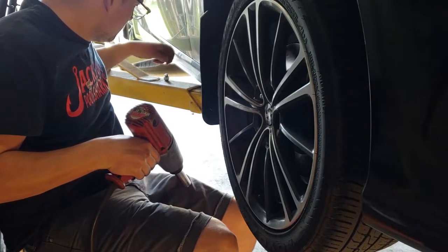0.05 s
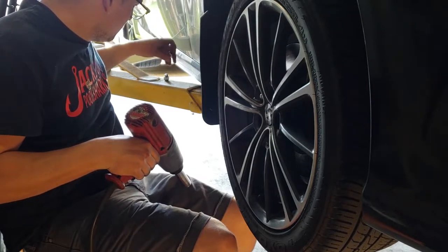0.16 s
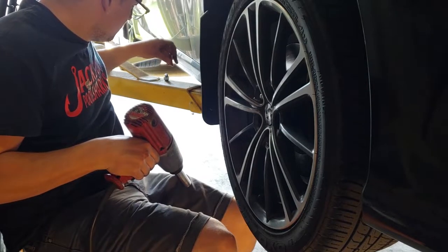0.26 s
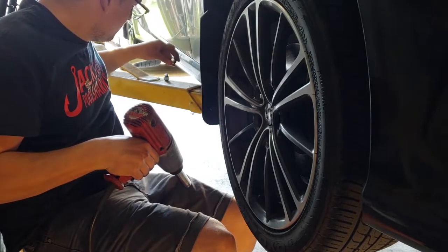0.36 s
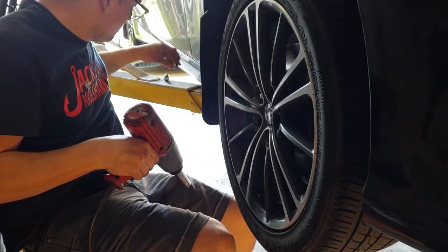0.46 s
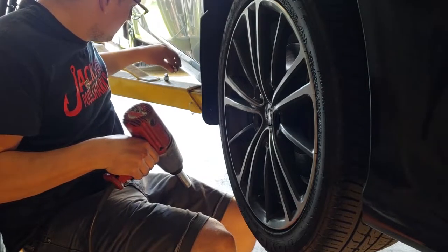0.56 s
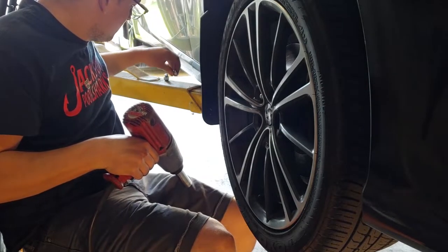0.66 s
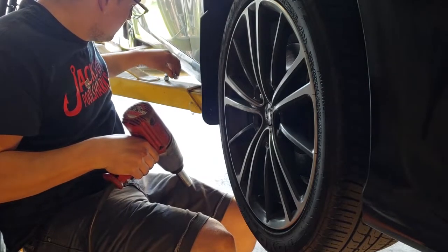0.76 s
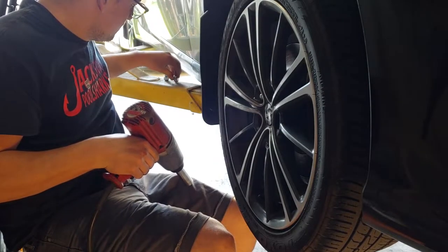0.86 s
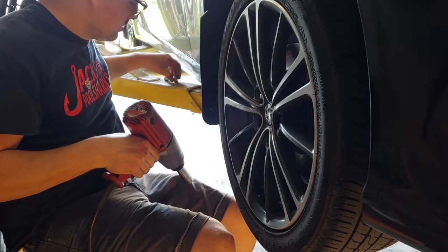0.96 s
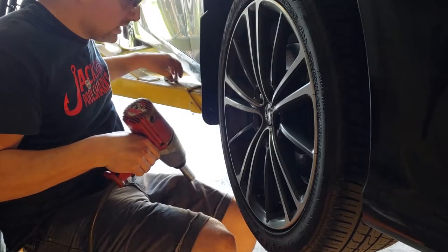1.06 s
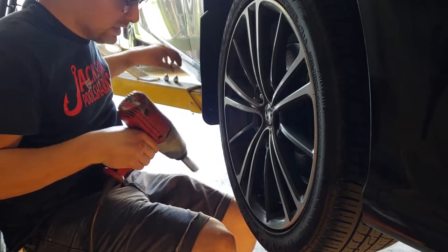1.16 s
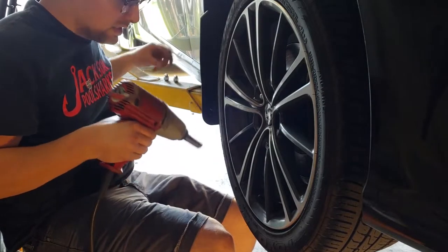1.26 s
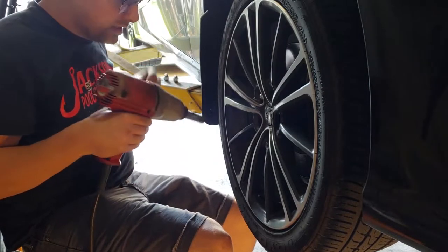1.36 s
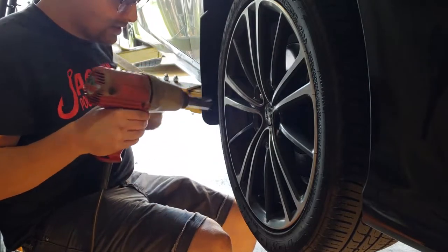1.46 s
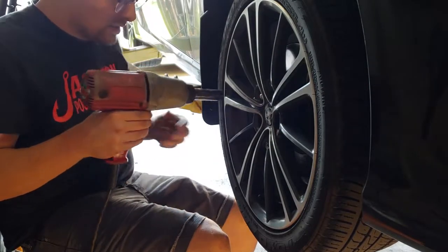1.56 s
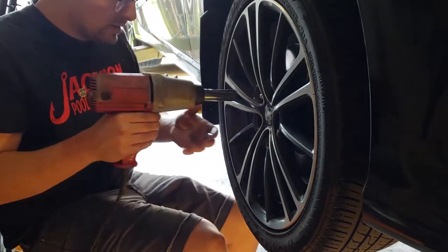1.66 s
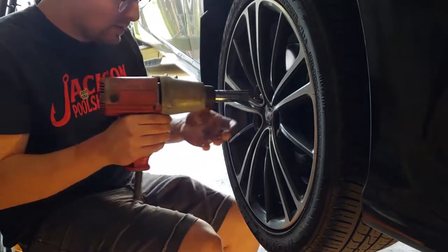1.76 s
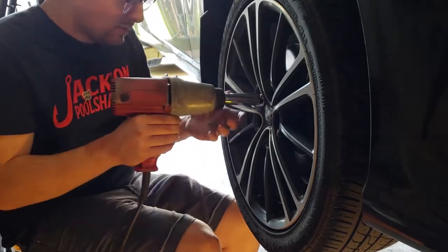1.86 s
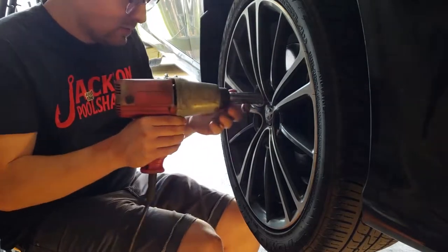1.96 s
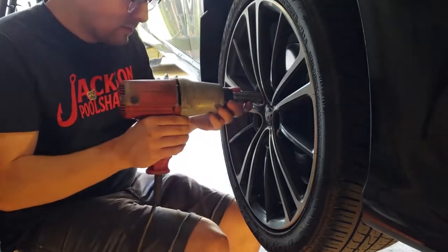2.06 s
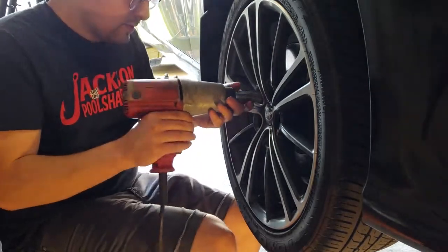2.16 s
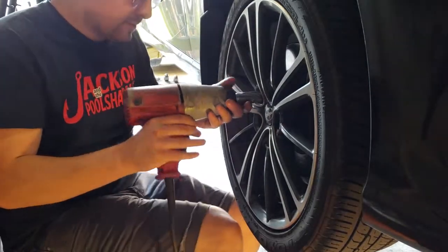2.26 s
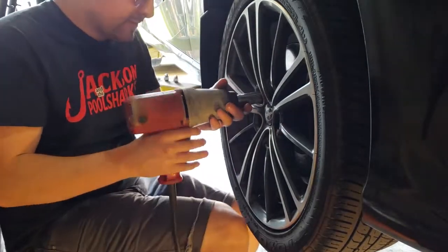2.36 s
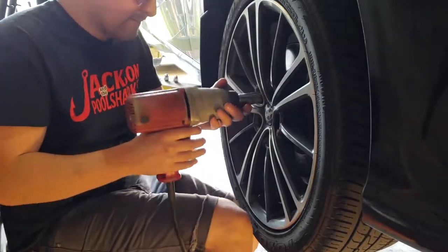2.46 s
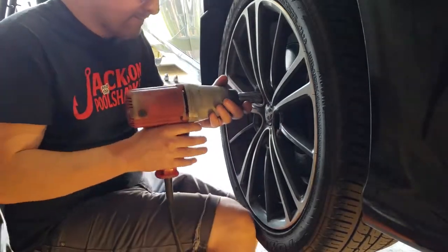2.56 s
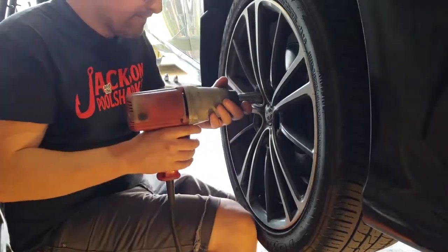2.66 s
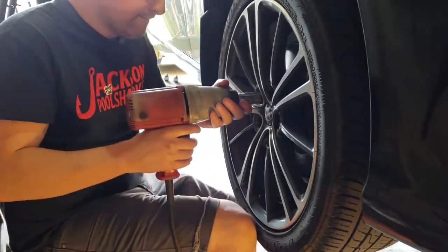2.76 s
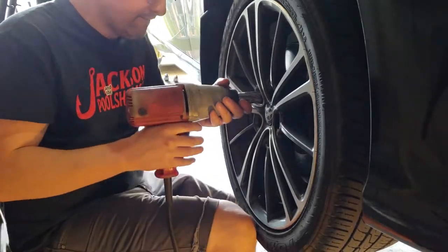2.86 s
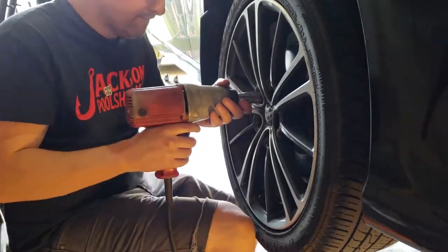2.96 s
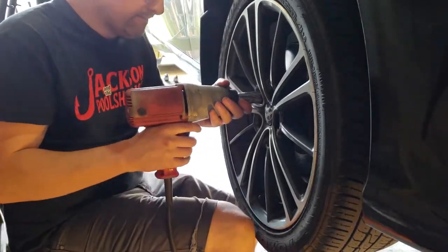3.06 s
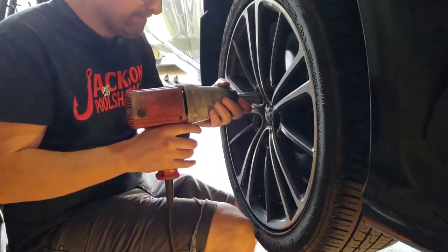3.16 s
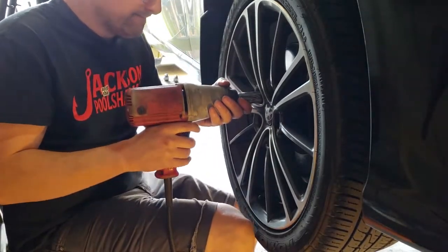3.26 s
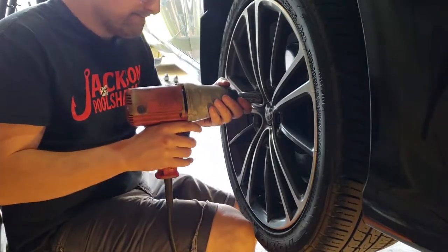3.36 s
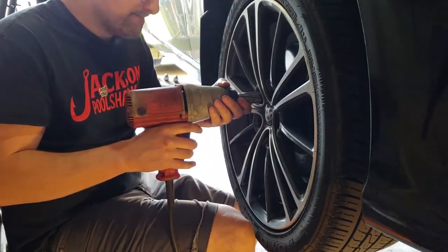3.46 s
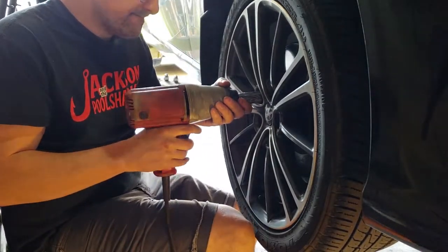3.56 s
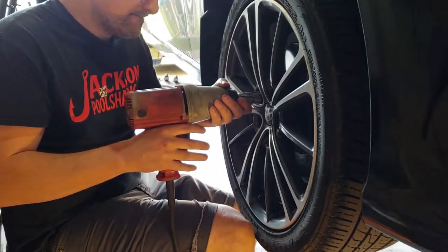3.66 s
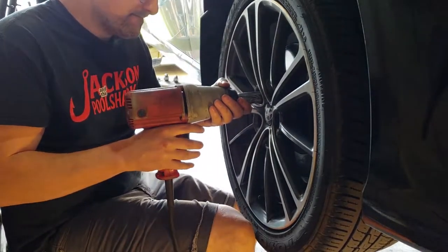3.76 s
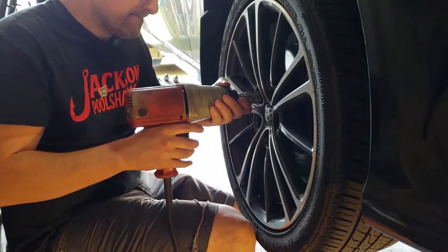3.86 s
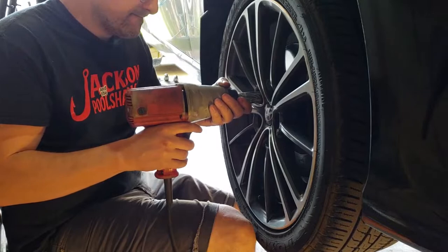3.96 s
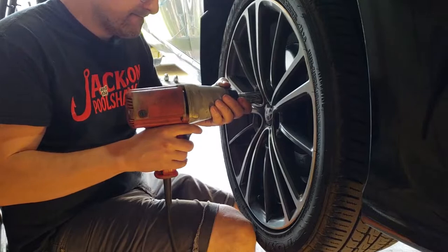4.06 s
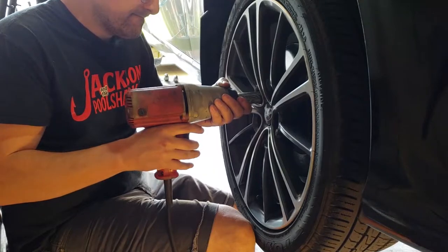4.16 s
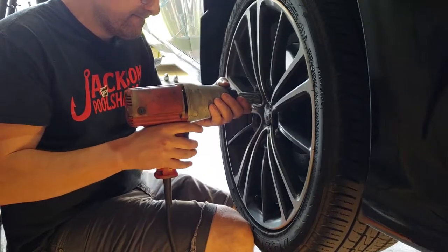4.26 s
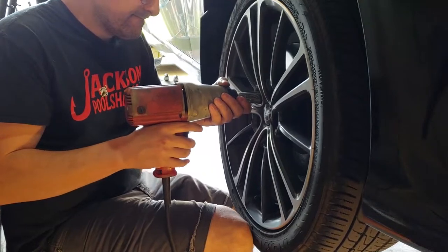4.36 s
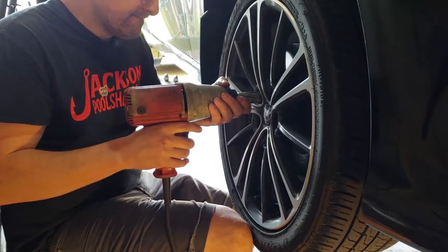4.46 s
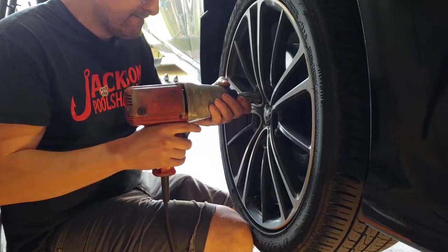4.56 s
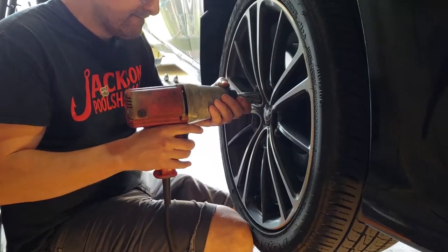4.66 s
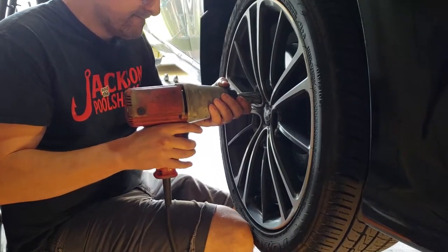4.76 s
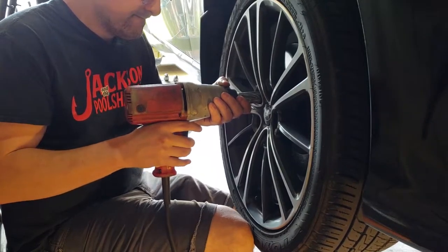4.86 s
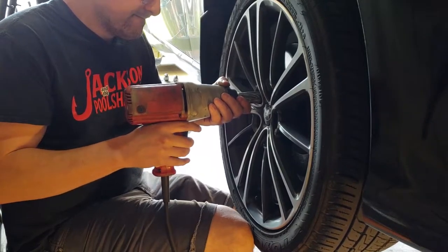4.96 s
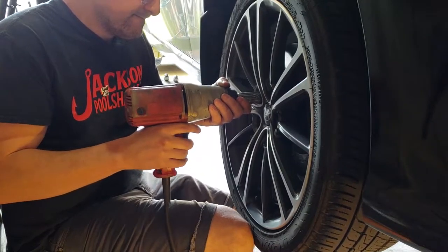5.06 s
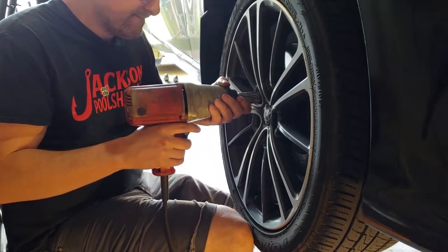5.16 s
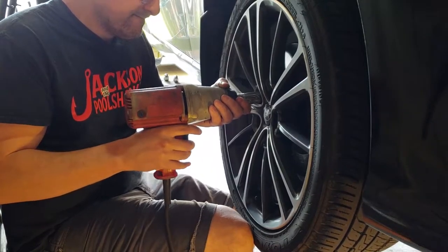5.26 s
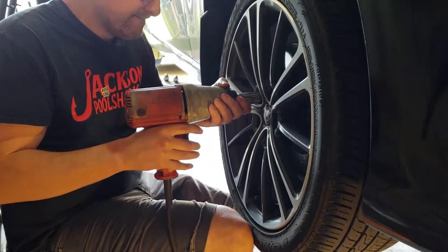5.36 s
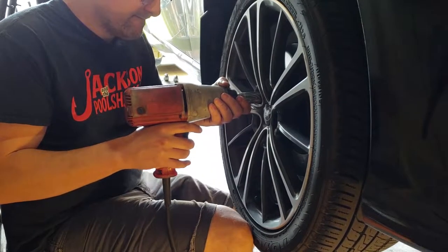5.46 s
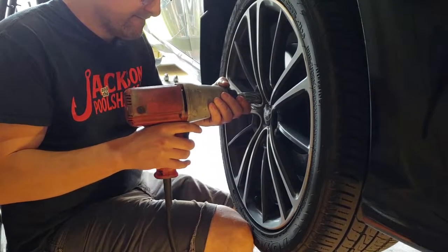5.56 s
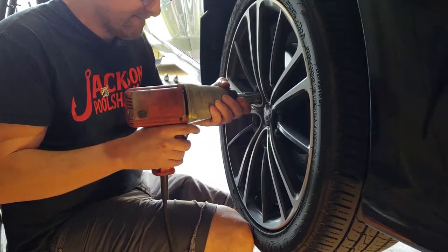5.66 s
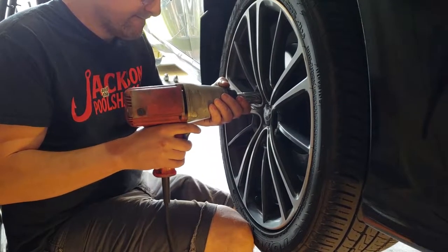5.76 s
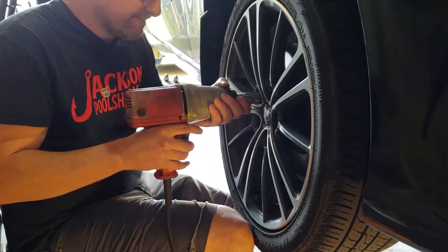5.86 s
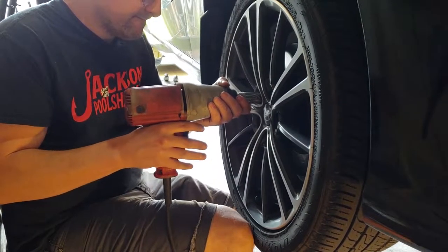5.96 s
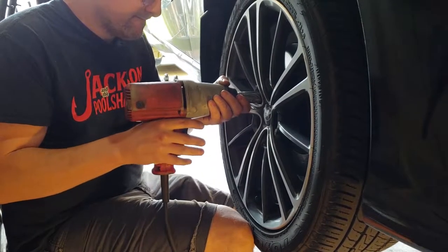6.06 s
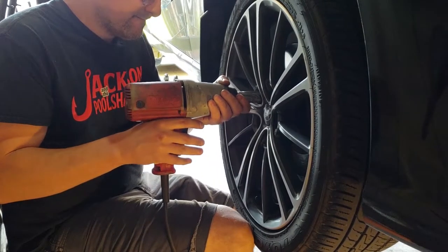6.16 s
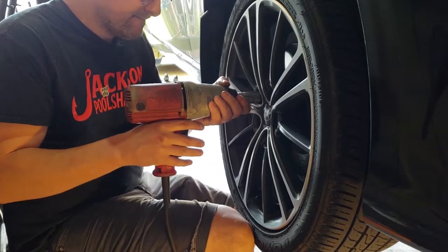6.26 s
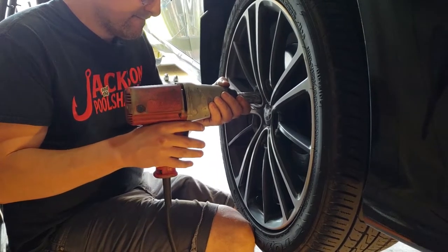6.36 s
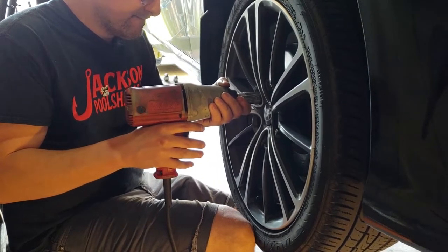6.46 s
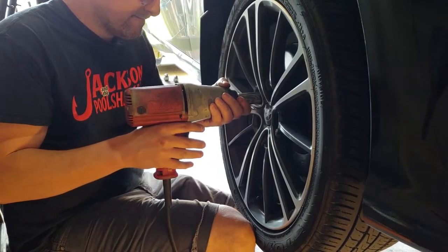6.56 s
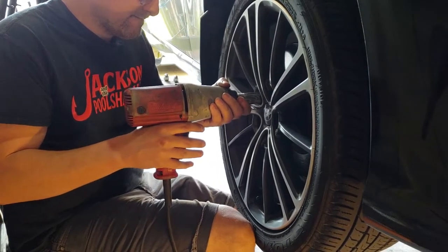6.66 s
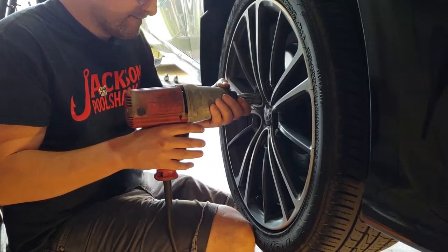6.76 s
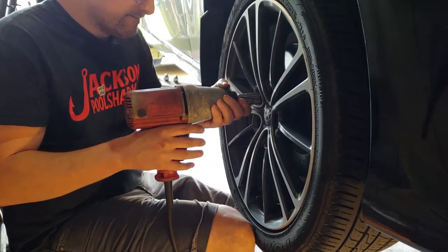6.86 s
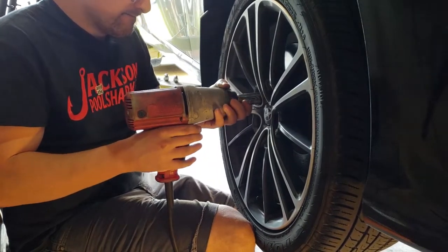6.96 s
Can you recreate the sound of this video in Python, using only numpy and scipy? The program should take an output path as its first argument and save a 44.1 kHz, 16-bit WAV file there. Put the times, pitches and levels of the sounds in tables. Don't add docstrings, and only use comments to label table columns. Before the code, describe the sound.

An open garage with low traffic rumble, faint engine drones and soft, far swishes. Near 1.05 s a nut is set down with a light bright clink; cloth rustles from about 1.3 s. At 2.06 s a socket meets the nut with a firm clack, followed by a slight scrape, clinks around 2.25 s, tiny ticks and a hollow push home at 2.65 s. Faint nudges and rustling follow. At 3.66 s an electric impact wrench suddenly fires, loudest in this first burst until 4.0 s: hard cracks, ringing socket, gear rattle and wheel knocks. Further bursts run at 4.13-4.5, 4.7-5.1, 5.25-5.7 and 5.8-6.1 s, generally softer. From about 6 s the freed motor coasts down, its buzzy whine falling through hiss, gear clicks and small squeaks until 7 s. Close stereo phone, short garage reflections, hammering leaning left.

```python
import sys
import numpy as np
from scipy import signal
from scipy.fft import rfft, irfft
from scipy.io import wavfile
from scipy.ndimage import uniform_filter1d

SR = 44100
rng = np.random.default_rng(int(sys.argv[2]) if len(sys.argv) > 2 else 0)


def generate_wav(sig):
    pcm = np.round(np.clip(np.atleast_2d(sig).T, -1, 1) * 32767).astype(np.int16)
    wavfile.write(sys.argv[1], SR, pcm)


def ratio_of_db(decibels):
    return 10 ** (np.asarray(decibels, float) / 20)


N = 309582
T = np.arange(N) / SR

# (time [s], crack level [dB], anvil level [dB])
BLOWS = [(3.6791, -4, -5), (3.704, -14, -14), (3.722, -6, -17), (3.766, -5, -18), (3.777, -6, -36),
         (3.7998, -13, -21), (3.8156, -3.5, -26), (3.8457, -6, -12), (3.8647, -11, -28), (3.8925, -2.5, -8),
         (3.97, -19, -32), (3.9772, -14, -19), (3.985, -23, -32), (4.002, -9, -23), (4.164, -35, -19.5),
         (4.1926, -6, -13.5), (4.2256, -4.5, -16), (4.2575, -7, -26), (4.289, -8, -19.5), (4.3246, -7, -26),
         (4.354, -10, -31), (4.3594, -18, -27), (4.393, -16, -26), (4.433, -16, -30), (4.4427, -13.5, -34),
         (4.5007, -15, -21.5), (4.5207, -22, -33), (4.714, -31, -26), (4.7254, -13, -21), (4.7651, -6, -19),
         (4.796, -11.5, -24), (4.8244, -7, -22), (4.853, -7.5, -24), (4.8872, -8, -34), (4.936, -7.5, -38),
         (4.973, -12.5, -20), (5.0148, -13, -23), (5.09, -18.5, -28), (5.119, -15, -27.5),
         (5.2866, -29, -35), (5.3089, -6.5, -24.5), (5.3405, -8, -19), (5.370, -7.5, -15),
         (5.3977, -7.5, -27), (5.4334, -8, -25), (5.465, -7.5, -19.5), (5.5004, -9.5, -33),
         (5.5425, -14.5, -20), (5.575, -13.5, -20), (5.6235, -22, -26), (5.6336, -16.5, -37),
         (5.7071, -26, -39), (5.7405, -20, -29.5), (5.8168, -30, -24), (5.8425, -11.5, -22.5),
         (5.8974, -15.5, -33), (5.9174, -9.5, -18), (5.9477, -7.5, -24), (5.9987, -34, -23),
         (6.0582, -4, -30)]
# (frequency [Hz], level [dB], t60 [s])
ANVIL_MODES = [(1558, -7, 0.024), (2540, -21, 0.088), (3087, -7.5, 0.025), (4030, 0.5, 0.0071),
               (4200, -6.5, 0.02), (4670, -1, 0.005)]
# (frequency [Hz], level [dB per Hz])
TREBLE = [(2940, -45), (5000, -3.5), (5750, -6), (7820, -7.5), (9170, -15), (12500, -9.5), (14000, -15.5),
          (15800, -12.5)]
CLICK_CRACK_DB, CLICK_ANVIL_DB = -8, -33
ANVIL_DB = 7
# (time [s], peak level [dB], pitch [Hz])
PINGS = [(3.681, -20, 4300), (3.7006, -3, 4160), (3.773, -6, 4110), (3.7946, -15, 4200),
         (3.8465, -18, 4190), (3.8924, -15, 4190), (3.9712, -16, 4200), (4.15, -32.5, 4160),
         (4.153, -27, 4210), (4.1647, -24, 4200), (4.2161, -14, 4270), (4.275, -8, 4220),
         (4.3244, -17, 4220), (4.3498, -22, 4190), (4.3613, -5, 4130), (4.3947, -24, 4000),
         (4.4127, -16, 4190), (4.4371, -15, 4170), (4.509, -24, 4330), (4.5229, -22, 4010),
         (4.711, -25, 4200), (4.73, -17, 4170), (4.7625, -12, 4360), (4.801, -21, 4200),
         (4.8276, -12, 4030), (4.8425, -9, 4080), (4.8876, -25, 4180), (4.969, -12, 4150),
         (5.017, -21, 4010), (5.0978, -22, 3940), (5.2802, -29, 4520), (5.2872, -25, 4480),
         (5.3304, -10.5, 4120), (5.3431, -16, 4220), (5.371, -4, 4200), (5.4009, -11, 4110),
         (5.4648, -13, 4410), (5.5242, -14, 4170), (5.578, -20, 4210), (5.71, -30, 4150),
         (5.743, -18.5, 4040), (5.818, -26, 4240), (5.8449, -16, 4120), (5.8973, -25, 4170),
         (5.9372, -12, 4350), (6.059, -14, 4200)]
PING_DB, PING_T60_S, PING_RISE_S = -5, 0.033, 0.0014

# (switch click [s], closing clack [s], rebound after [s],
# rattle level at full speed [dB], rattle level at the end [dB])
PULLS = [
    (3.66, 3.963, 0.024, -15.5, -21.5),
    (4.131, 4.492, 0.034, -21, -27),
    (4.697, 5.09, 0.016, -26.5, -26),
    (5.248, 5.696, 0.043, -25, -29.5),
    (5.786, 6.095, 0.0047, -29, -28.5),
]
START_DB, SPIN_UP_S = -13, 0.035
STALL_S, STALL_DB, RELEASE_S, RELEASE_DB = 0.039, -11, 0.048, -24.5
DULL_START_DB, DULL_STALL_DB, DULL_END_DB = -17, -13, -30
LIFT_S, LIFT_DB = 0.0059, -1
# (frequency [Hz], width [Hz], level [dB])
GUN_PEAKS = [(1560, 98, 3.5), (2360, 140, 4.5), (2580, 70, 4), (3290, 70, 3), (4190, 55, 10),
             (5100, 150, -4)]
# (frequency [Hz], level [dB per Hz])
GUN_COLOUR = [(59, -44), (100, -37), (670, -12.5), (844, 3.5), (1390, -4.5), (2540, 4.5), (3630, 3),
              (4180, 6), (7000, -24), (9100, -40), (15400, -120)]
SEATING_S, SEATED = 0.96, 0.32
# (frequency [Hz], level [dB], t60 [s])
SWITCH_MODES = [(6800, 3, .012), (12300, -5, .015)]
SWITCH_DB = -30

# (time [s], level [dB], pitch [Hz])
KNOCKS = [(3.663, -23.5, 1144), (3.679, -8, 1038), (3.691, -17, 1002), (3.723, -43, 1140),
          (3.772, -22, 1050), (3.791, -22.5, 880), (3.804, -17, 1130), (3.84, -16.5, 1030),
          (3.863, -18.5, 1047), (3.901, -12.5, 997), (3.903, -18, 885), (3.972, -24, 877),
          (3.97, -15.5, 1003), (3.987, -20.5, 1085), (4.137, -34, 1068), (4.172, -27, 1110),
          (4.181, -30, 1010), (4.2, -17.5, 892), (4.226, -12, 922), (4.257, -17, 920), (4.291, -20.5, 910),
          (4.324, -18.5, 886), (4.359, -17.5, 1025), (4.402, -24.5, 890), (4.423, -20, 837),
          (4.441, -21, 1028), (4.496, -16, 850), (4.509, -18, 858), (4.721, -15.5, 920),
          (4.752, -18.5, 835), (4.769, -22.5, 915), (4.788, -35, 865), (4.805, -18.5, 867),
          (4.838, -20, 813), (4.857, -33, 890), (4.882, -21.5, 874), (4.937, -18, 844), (4.978, -23.5, 840),
          (5.02, -24, 914), (5.09, -18, 852), (5.12, -25.5, 983), (5.285, -18.5, 867), (5.31, -13.5, 848),
          (5.348, -14.5, 850), (5.364, -26, 890), (5.409, -17, 850), (5.465, -24.5, 824), (5.494, -21, 820),
          (5.543, -20.5, 858), (5.634, -15.5, 870), (5.647, -22, 855), (5.708, -17.5, 855),
          (5.725, -17, 825), (5.841, -18.5, 880), (5.918, -18.5, 890), (5.948, -22.5, 920),
          (5.999, -28.5, 854), (6.022, -25.5, 986), (6.059, -29, 910)]
# (time [s], peak level [dB])
BUMPS = [
    (2.331, -47),
    (3.722, -45),
    (4.219, -67),
    (5.307, -44),
    (6.059, -57.5),
]
# (time [s], level [dB])
THUDS = [
    (3.677, -8),
    (3.698, -45),
    (3.849, -14),
]

COAST_S, BARS_HZ, DRAG_HZ, SLOWING_S = 5.98, 1694, 789, 1.01
FREE_S = 0.21
COAST_DIP_DB, COAST_DIP_S = -13, 0.057
BRUSH_DB, QUIET_HZ = -37.5, 540
WHINE_DB, WHINE_DB_PER_OCT = -16.5, 2.5
# (frequency [Hz], width [Hz], level [dB])
COAST_PEAKS = [(920, 1700, -15.5), (2300, 270, -4), (3800, 25, -19), (4160, 125, -0.5), (4580, 28, -23),
               (5130, 110, -9), (6950, 310, 0), (7800, 110, -8)]
# (frequency [Hz], level [dB per Hz])
COAST_COLOUR = [(88, -46), (310, -43), (410, -9), (669, -19.5), (898, 3.5), (1410, -7), (4250, -4),
                (6170, -12), (7080, -29), (9330, -14.5), (15300, -16.5), (16500, -21)]
# (time [s], peak level [dB])
CATCHES = [(6.2021, -28), (6.282, -16.5), (6.299, -21), (6.3622, -23), (6.399, -28), (6.4341, -28),
           (6.481, -18), (6.6192, -36), (6.6558, -18), (6.7136, -19), (6.909, -26)]
# (time [s], peak level [dB])
SQUEAKS = [(6.205, -33), (6.2316, -37), (6.25, -25), (6.282, -23), (6.3129, -28), (6.395, -23),
           (6.476, -32), (6.5529, -35), (6.6956, -45)]
# (frequency [Hz], level [dB], t60 [s])
SQUEAK_MODES = [(12090, 10, 0.051)]

# (frequency [Hz], level [dB], t60 [s])
NUT = [
    [(1.042, -30.5), (1.063, -37), (1.075, -42.5), (1.101, -57), (1.15, -50)],
    [(180, -45), (300, -20), (1350, -22), (2600, -11), (2780, -16), (3330, -8.5), (3980, -18), (4390, -15), (15000, -66)],
    [(2060, 3.5, 0.03), (2830, -12, 0.034), (2570, -5.5, 0.098), (3120, -6, 0.065), (3280, -19, 0.088), (3700, -14, 0.027), (4300, -13, 0.087), (5100, -16, .04), (4630, -19, 0.06), (5590, -14, 0.07), (7250, -29, .08)],
]
SEAT = [
    [(2.06, -15), (2.076, -30), (2.099, -31.5)],
    [(88, -33.5), (150, -41.5), (445, -9.5), (631, -23.5), (1120, 0), (1320, -8), (2060, -11.5), (3160, -19.5), (4650, -23), (15500, -46)],
    [(1110, -4.5, 0.025), (1190, -7, .025), (1250, -16, 0.026), (1490, -29, .08), (12200, -24, 0.096)],
]
HOME = [
    [(2.649, -11.5), (2.655, -46), (2.664, -32)],
    [(88, -50), (150, -16), (340, -15), (430, -14), (631, -20), (1150, -9), (1830, -22), (2410, -16.5), (4750, -19), (5990, -30), (15500, -62)],
    [(437, -2, 0.076), (517, -5.5, 0.067), (1154, 2, 0.041), (2500, -22, 0.1)],
]
CLINK = [
    [(2.233, -26), (2.255, -18.5)],
    [(88, -75), (150, -37), (490, -3), (643, -27), (1090, 4), (1340, -11.5), (2760, -4), (3900, -9), (10100, -35), (12300, -21), (15500, -47)],
    [(847, -7.5, 0.046), (3490, -5, 0.028), (6730, -13, 0.047)],
]
TICK = [
    [(2.3052, -23.5), (2.4623, -23.5), (2.5396, -40), (3.3608, -36.5)],
    [(180, -59), (450, -22), (900, -9.5), (2930, -14), (4490, -5.5), (6050, -16), (6900, -11.5), (10100, -27), (12900, -16), (15500, -35)],
    [(1130, 3, 0.034), (7140, -21, 0.0078)],
]
NUDGE = [
    [(1.933, -51), (1.975, -44.5), (2.54, -47), (2.566, -50), (2.717, -48), (2.818, -43), (3.01, -57), (3.088, -44.5), (3.282, -49.5), (3.332, -49), (3.35, -45), (3.375, -51)],
    [(180, -61), (300, -10), (925, -5.5), (3140, -12), (3510, -24), (8000, -29), (10400, -50), (17600, -120)],
    [(696, 9.7, 0.052), (890, 9.8, 0.07)],
]
# (time [s], level [dB])
SCRAPE = [
    (2.13, -73),
    (2.2, -53.5),
    (2.232, -62),
]
# (time [s], level [dB], pitch [Hz])
CREAK = [
    (2.97, -74, 3930),
    (3.0, -81, 3800),
    (3.08, -75, 4000),
    (3.12, -77, 3930),
]

# (frequency [Hz], t60 [s], level [dB])
GARAGE = [(218, 0.99, 2.5), (420, 0.55, 1), (790, 0.23, -3.5), (1316, 0.46, -6.5), (2340, 0.44, -2),
          (5580, 0.42, -3), (10800, 0.23, 2.5)]
# (frequency [Hz], t60 [s], level [dB])
ARCH = [(2194, 0.026, 1), (6250, 0.032, 4), (13500, 0.031, 5)]

# (start [s], end [s], rustle level [dB], thud relative to rustle [dB])
CLOTH = [(1.33, 1.427, -68.5, -28), (1.498, 1.59, -70.5, -18), (1.88, 2.045, -64, -8.5),
         (2.263, 2.651, -61, 1), (2.694, 2.8, -66, -4), (3.028, 3.08, -75, 6.5), (3.303, 3.405, -69.5, 4.5)]
CLOTH_IN_S, CLOTH_OUT_S, CLOTH_EDGE_DB = 0.15, 0.3, -18.5
# (frequency [Hz], level [dB per Hz])
CLOTH_COLOUR = [(2940, -5.5), (5000, -5.5), (7090, -14), (10500, -11), (13900, -9.5), (16000, -13),
                (16500, -33)]
# (frequency [Hz], width [Hz], level [dB])
PANELS = [(215, 77, 4.5), (408, 44, 1.5)]
# (start [s], length [s], level [dB], from [Hz], to [Hz])
SWISHES = [(0.0, 0.3, -68, 4100, 3220), (0.652, 0.22, -70.5, 4080, 2890), (1.201, 0.35, -68, 3950, 3420),
           (3.137, 0.29, -66.5, 5100, 2900)]
SWISH_RISE, SWISH_HOLD, SWISH_EDGE_DB = 0.21, 0.47, -7
WHISTLE_HZ, WHISTLE_DB = 7330, -89
# (frequency [Hz], level [dB per Hz])
AIR = [(12, -91), (20, -16.5), (69, -6), (96, -1.5), (131, -14.5), (179, -23.5), (230, -28.5), (616, -23),
       (709, -20.5), (863, -19.5), (1050, -17), (1840, -24), (2970, -32), (14300, -43), (16500, -100)]
AIR_DB = -70
# (time [s], level [dB])
RUMBLE = [(0.0, -59), (0.45, -62.5), (1.0, -59), (2.0, -60), (2.45, -53), (3.2, -57.5), (3.65, -62.5),
          (3.89, -52), (4.5, -63), (5.24, -60), (5.45, -62.5), (6.26, -65.5), (7.02, -78)]
LORRY_S, LORRY_RISE_S, LORRY_DB = 6.42, 0.11, -62
# (start [s], end [s], from [Hz], to [Hz], level [dB])
DRONES = [(0.857, 2.49, 108, 112, -64.5), (3, 4, 120, 110, -62.5), (1.535, 1.8, 70, 48, -60),
          (1.6, 1.5, 255, 240, -82), (1.6, 3.15, 229, 200, -69), (1.5, 3.7, 165, 270, -73),
          (5.9, 3.6, 870, 370, -74)]
DRONE_FADE_S = 0.23
NARROW_HZ, NARROW_DB = 720, -6.5
TOP_HZ = 15650


def band(x, lo_hz, hi_hz):
    return signal.sosfilt(signal.butter(3, [lo_hz, min(hi_hz, .45 * SR)], "band", fs=SR, output="sos"), x)


def unit(x):
    return x / np.sqrt(np.mean(x ** 2))


def gain_of(s, db):
    return ratio_of_db(np.interp(T, s, db, left=-140, right=-140))


def body(x, colour, peaks=(), base_db=0.):
    f = np.fft.rfftfreq(8192, 1 / SR)
    hz, db = np.array(colour).T
    power = ratio_of_db(2 * (base_db + np.interp(np.log(f + 1), np.log(hz), db)))
    for hz, width, db in peaks:
        power = power + ratio_of_db(2 * db) / (1 + (2 * (f - hz) / width) ** 2)
    cep = irfft(np.log(power) / 2)
    cep[1:4096] *= 2
    cep[4097:] = 0
    return signal.fftconvolve(x, irfft(np.exp(rfft(cep)))[:4096])[:N]


def ring(x, modes, longest_s=.3):
    out = 0
    for k, (hz, db, t60) in enumerate(modes):
        pole = np.exp(2j * np.pi * hz / SR - np.log(1000) / (min(t60, longest_s) * SR))
        out = out + (-1) ** k * ratio_of_db(db) * signal.lfilter([1], [1, -pole], x).imag
    return out


def puffs(s, db, decay_s, rise_s, hard=False):
    x = np.zeros(N)
    np.add.at(x, np.clip((np.asarray(s) * SR).astype(int), 0, N - 1), ratio_of_db(np.asarray(db)))
    t = T[:int(8 * decay_s * SR)]
    shape = np.exp(-t / decay_s) * (1 - np.exp(-t / rise_s))
    noise = rng.standard_normal(N)
    return signal.fftconvolve(x, shape)[:N] * (np.sign(noise) if hard else noise)


def walk(rate):
    k = int(SR / rate)
    return unit(uniform_filter1d(uniform_filter1d(rng.standard_normal(N), k), k))


def grit(rate, spread_db):
    return (rng.random(N) < rate / SR) * ratio_of_db(spread_db * rng.exponential(size=N)) * rng.standard_normal(N)


def sweep(hz):
    return np.sin(2 * np.pi * np.cumsum(hz) / SR)


def add_at(out, s, sound):
    start = int(s * SR)
    out[start:start + len(sound)] += sound


def blows():
    clicks = [(click, full_db + CLICK_CRACK_DB, full_db + CLICK_ANVIL_DB) for click, _, _, full_db, _ in PULLS]
    return np.vstack([np.array(BLOWS) + [0, 0, ANVIL_DB], clicks]).T


def hammer(s, db, anvil_db):
    snap = puffs(s, db + 10.5, .002, .0004, hard=True)
    spray = puffs(s, db - 8.5, 0.0056, 0.0011)
    crack = body(snap + spray, TREBLE) + band(snap, 1630, 7530) * ratio_of_db(-11.0)
    tone = ring(puffs(s, anvil_db - 26.0, 0.011, 0.0015), ANVIL_MODES)
    knock = band(puffs(s, anvil_db - 13.0, 0.0025, 0.00028), 670, 8800)
    return crack + tone + knock


def pings():
    out, t = np.zeros(N), T[:SR // 10]
    for (s, db, hz), turn in zip(PINGS, rng.random((len(PINGS), 2))):
        upper_hz = hz * (1.1 + 0.154 * turn[0])
        pair = np.sin(2 * np.pi * hz * t) + 0.38 * np.sin(2 * np.pi * (upper_hz * t + turn[1]))
        fade = ratio_of_db(db + PING_DB - 60 * t / PING_T60_S) * (1 - np.exp(-t / PING_RISE_S))
        add_at(out, s, pair * fade)
    return out


def effort():
    level, bright = 0, 0
    for click, clack, rebound, full_db, end_db in PULLS:
        settled = clack + rebound
        s = [click - .008, click, click + SPIN_UP_S, clack - STALL_S, clack - .006, clack,
             settled, settled + RELEASE_S]
        db = np.array([full_db - 56, full_db + START_DB, full_db, end_db, end_db + STALL_DB, end_db,
                       end_db, end_db + RELEASE_DB])
        dull = np.array([0, DULL_START_DB, 0, 0, DULL_STALL_DB, 0, 0, DULL_END_DB])
        level = level + gain_of(s, db)
        bright = bright + gain_of(s, db + dull)
    return level, bright


def hush():
    s, db, _ = np.transpose(BLOWS)
    coarse = T[::32]
    ahead = (s[:, None] - coarse) / LIFT_S
    depth = ratio_of_db(np.minimum(db + 10.5, 0))[:, None]
    dip = np.max(depth * np.exp(-np.abs(ahead)) * (ahead > 0), axis=0)
    return ratio_of_db(LIFT_DB * np.interp(T, coarse, dip))


def rattle():
    teeth = unit(grit(5000, 2.43)) + 0.63 * rng.standard_normal(N)
    drive = teeth * ratio_of_db(1.5 * walk(83)) * hush()
    gun = body(drive, GUN_COLOUR, GUN_PEAKS, 0.99)
    low, deep = unit(band(gun, 120, 502)), unit(band(gun, 770, 973))
    high, middle = unit(band(gun, 930, 1200)), unit(band(gun, 1400, 6670))
    seated = np.clip((T - PULLS[0][0]) / SEATING_S, 0, SEATED)
    thrum = np.sqrt(seated) * deep + ratio_of_db(-3.0) * np.sqrt(1 - seated) * high
    treble = unit(band(body(drive, TREBLE), 2600, 15100))
    level, bright = effort()
    gears = level * ratio_of_db(-4.5) * middle + bright * ratio_of_db(-9.5) * treble
    return gears, level * (ratio_of_db(-20.0) * low + ratio_of_db(-8.0) * thrum)


def switch():
    s, db = np.transpose(PULLS)[[0, 3]]
    return ring(puffs(s, db + SWITCH_DB, 0.01, 0.00042), SWITCH_MODES)


def jolts():
    out, t = np.zeros(N), T[:SR // 8]
    times, wheel_db, _ = np.transpose(KNOCKS)
    fade = ratio_of_db(-60 * t / 0.05) * (1 - np.exp(-t / 0.0021))
    for (s, db, hz), turn in zip(KNOCKS, rng.random((len(times), 3))):
        upper_hz, lower_hz = hz * (1.04 + 0.11 * turn[0]), hz * (0.95 - 0.084 * turn[2])
        cluster = np.sin(2 * np.pi * hz * t)
        cluster = cluster + 0.39 * np.sin(2 * np.pi * (upper_hz * t + turn[1]))
        cluster = cluster + 0.069 * np.sin(2 * np.pi * (lower_hz * t + turn[0]))
        add_at(out, s, ratio_of_db(db + 1.0) * cluster * fade)
    for s, db in BUMPS:
        add_at(out, s, ratio_of_db(db + 13.0) * np.sin(2 * np.pi * 75 * t) * np.exp(-t / 0.0066))
    tyre = band(puffs(*np.transpose(THUDS), 0.025, 0.00039), 237, 450)
    return out + tyre + band(puffs(times, wheel_db, 0.0036, 0.00061), 320, 1600)


def coast():
    hz = np.clip((BARS_HZ + DRAG_HZ) * np.exp((COAST_S - T) / SLOWING_S) - DRAG_HZ, 50, BARS_HZ)
    dip_db = COAST_DIP_DB * np.exp(-np.abs(T - COAST_S) / COAST_DIP_S)
    level = ratio_of_db(BRUSH_DB + dip_db - (QUIET_HZ / hz) ** 2) * np.clip((T - COAST_S) / FREE_S + 1, 0, 1)

    phase = np.cumsum(hz * (1 + .014 * walk(50))) / SR
    bars = np.exp(9 * np.cos(2 * np.pi * phase)) + .8 * np.exp(30 * np.cos(np.pi * phase) - 21)
    bars = bars * ratio_of_db(4.5 * walk(30))
    whine = band(body(bars, [(800, -10.0), (1200, 1.5), (1500, -4), (2700, -6)]), 900, 2400)
    whine = whine / np.std(whine[T > COAST_S]) * ratio_of_db(WHINE_DB + WHINE_DB_PER_OCT * np.log2(BARS_HZ / hz))

    housing = body(rng.standard_normal(N), COAST_COLOUR, COAST_PEAKS, -1.7)
    edges = 300 * 1.5 ** np.arange(11)
    hiss = unit(sum(band(housing, lo, hi) * ratio_of_db(1.2 * walk(59)) for lo, hi in zip(edges, edges[1:])))
    contacts = puffs(T[rng.random(N) < 200 / SR], 0., 0.0061, 0.00069)
    chatter = unit(body(contacts, COAST_COLOUR, COAST_PEAKS, -1.1))
    catches = body(puffs(*np.transpose(CATCHES), 0.0077, 0.00083), COAST_COLOUR, COAST_PEAKS, -6.5) * ratio_of_db(-2)
    squeak = ring(puffs(*np.transpose(SQUEAKS), 0.0026, 0.0022) * ratio_of_db(-22.0), SQUEAK_MODES)
    return (hiss * ratio_of_db(-3.5) + chatter * ratio_of_db(-5.5) + whine) * level + squeak + catches


def tap(events, colour, modes, ring_db, decay_s, clatter_db):
    s, db = np.transpose(events)
    tone = ring(puffs(s, db + ring_db, decay_s, 0.00063), modes)
    return tone + body(puffs(s, db + clatter_db, decay_s, 0.0007), colour)


def handling():
    return (tap(*NUT, -36.5, 0.021, 3.1) + tap(*SEAT, -34.0, 0.013, 8.8) + tap(*HOME, -36.5, 0.0071, 9.5)
            + tap(*CLINK, -31.5, 0.011, 4.0) + tap(*TICK, -51, 0.0051, 7.7) + tap(*NUDGE, -39.0, 0.009, 7.2))


def rubbing():
    s, db, hz = np.transpose(CREAK)
    creak = sweep(np.interp(T, s, hz) * (1 + .012 * walk(180))) * ratio_of_db(4.0 * walk(60))
    scrape = unit(band(grit(3000, 1.7), 1100, 3300))
    return scrape * gain_of(*np.transpose(SCRAPE)) + creak * gain_of(s, db)


def reflections(x, surfaces, size, count):
    t, out = T[:count * size], np.zeros(N + SR)
    fade = np.hanning(2 * size + 1)[:-1]
    scatter = np.array([band(rng.standard_normal(N + SR), hz / 1.8, hz * 1.6) for hz, _, _ in surfaces])
    dying = np.array([ratio_of_db(db - 60 * t / t60) * np.sqrt(14 / t60 / SR) for _, t60, db in surfaces])
    for at in range(0, N - 2 * size, size):
        tail = np.sum(scatter[:, at:at + len(t)] * dying, axis=0) * (1 - np.exp(-t / 0.000077))
        wet = signal.fftconvolve(x[at:at + 2 * size] * fade, tail)
        out[at:at + len(wet)] += wet
    return out[:N]


def air():
    return body(rng.standard_normal(N), AIR)


def cloth():
    rustle_gain, thud_gain = 0, 0
    for start, end, db, thud_db in CLOTH:
        edge_db = CLOTH_EDGE_DB * np.array([1, 0, 0, 1])
        gain = gain_of([start - CLOTH_IN_S, start, end, end + CLOTH_OUT_S], db + edge_db)
        rustle_gain = rustle_gain + gain
        thud_gain = thud_gain + gain * ratio_of_db(thud_db)
    rustle = unit(band(body(grit(6000, 0.81), CLOTH_COLOUR, [(7240, 1300, -4.0)]), 2370, 23000))
    thud = unit(band(body(air(), [(100, -9.0)], PANELS), 197, 930))
    return rustle * rustle_gain + thud * thud_gain * ratio_of_db(2.0 * walk(24))


def swishes():
    out = 0
    for s, length, db, hz, end_hz in SWISHES:
        at = s + length * np.array([0, SWISH_RISE, SWISH_HOLD, 1])
        carrier = np.cos(2 * np.pi * np.cumsum(np.interp(T, [s, s + length], [hz, end_hz])) / SR)
        swish = unit(carrier * band(rng.standard_normal(N), 20, 850))
        out = out + swish * gain_of(at, db + SWISH_EDGE_DB * np.array([1, 0.43, 0.024, 2.3]))
    return out


def around():
    capsule = unit(band(rng.standard_normal(N), 11000, 19000)) * ratio_of_db(-83.5)
    thin_hiss = unit(band(rng.standard_normal(N), WHISTLE_HZ - 400, WHISTLE_HZ + 400)) * ratio_of_db(WHISTLE_DB + 2.0 * walk(3))
    breeze = unit(band(air(), 275, 16500)) * ratio_of_db(AIR_DB - 2.5 + walk(4.2))
    return capsule + thin_hiss + breeze + cloth() + swishes()


def traffic():
    both, apart = [unit(band(air(), 25, 288)) for _ in range(2)]
    rumble = (both + .27 * apart * np.array([[1], [-1]])) * gain_of(*np.transpose(RUMBLE))
    lorry = ratio_of_db(LORRY_DB) * np.clip((T - LORRY_S) / LORRY_RISE_S, 0, 1)
    return rumble + sweep(70 + 1.16 * walk(4.0)) * ratio_of_db(1.3 * walk(8.7)) * lorry


def drones():
    out = 0
    for start, end, hz, end_hz, db in DRONES:
        tone = sweep(np.interp(T, [start, end], [hz, end_hz]) * (1 + 0.0078 * walk(5)))
        at = [start - DRONE_FADE_S, start, end, end + DRONE_FADE_S]
        out = out + tone * ratio_of_db(1.1 * walk(7)) * gain_of(at, db + 3.5 - np.array([29, 1, -1.5, 9]))
    return out


def late(x, count):
    return np.concatenate([np.zeros(count), x[:N - count]])


def scene():
    gears, thrum = rattle()
    anvil = gears + hammer(*blows()) + pings()
    rest = thrum + jolts() + coast() + handling() + rubbing() + switch()
    left = ratio_of_db(1.5) * (anvil + rest)
    right = ratio_of_db(0.04) * (late(anvil, 19) + late(rest, 2))
    shared = around()
    ports = []
    for direct in (left, right):
        walls = reflections(anvil + rest, GARAGE, size=2400, count=8)
        arch = reflections(anvil + rest, ARCH, size=500, count=6)
        ports.append(direct + walls + arch + 0.36 * shared + 1.29 * around())
    ports = np.array(ports)
    apart = band((ports[0] - ports[1]) / 2, 71, NARROW_HZ * 3) * (1 - ratio_of_db(NARROW_DB))
    return ports - apart * np.array([[1], [-1]]) + traffic() + drones()


def roll_off(x):
    return signal.sosfilt(signal.butter(12, 16990, fs=SR, output="sos"), x)


def record(dry):
    rounded = np.tanh(1.1 * dry) / 1.1
    mix = signal.sosfilt(signal.ellip(10, .2, 80, TOP_HZ, fs=SR, output="sos"), rounded)
    return roll_off(mix)


dry = scene()
out = record(dry)
generate_wav(out)
```